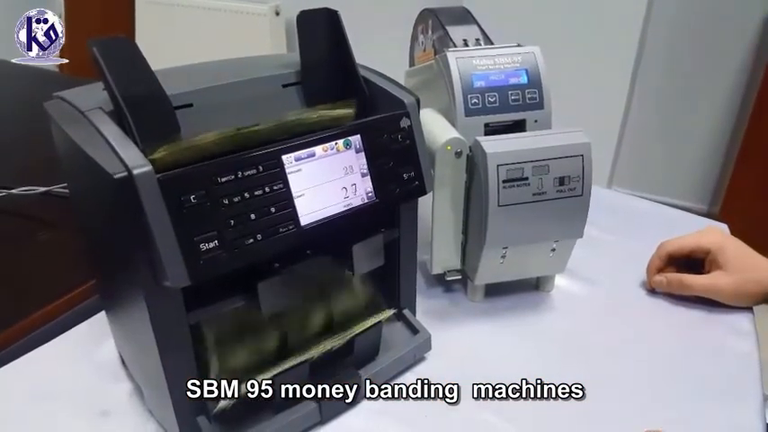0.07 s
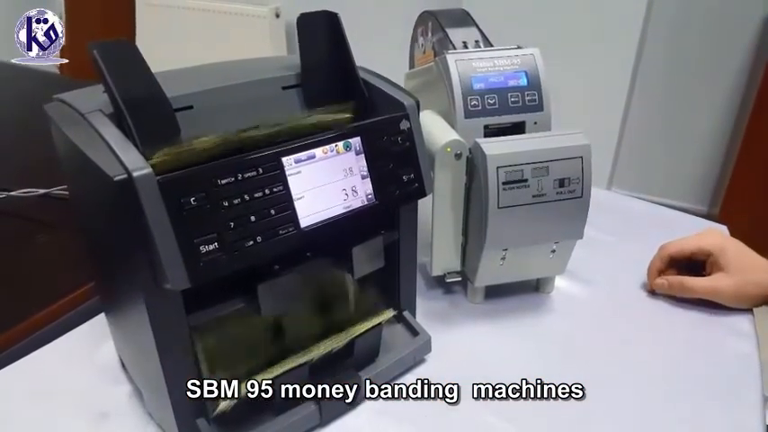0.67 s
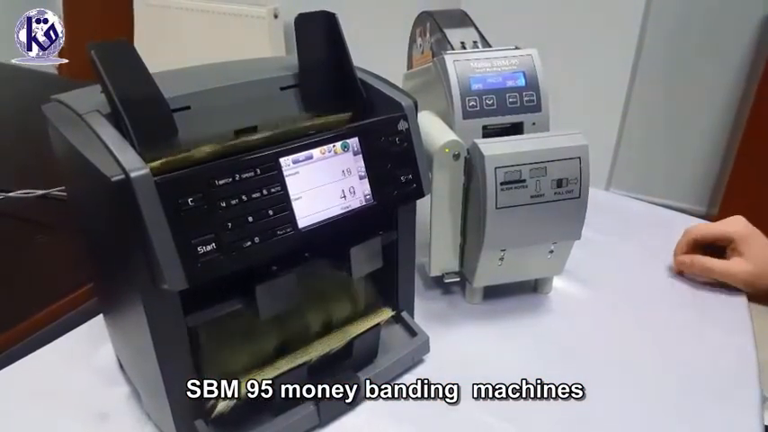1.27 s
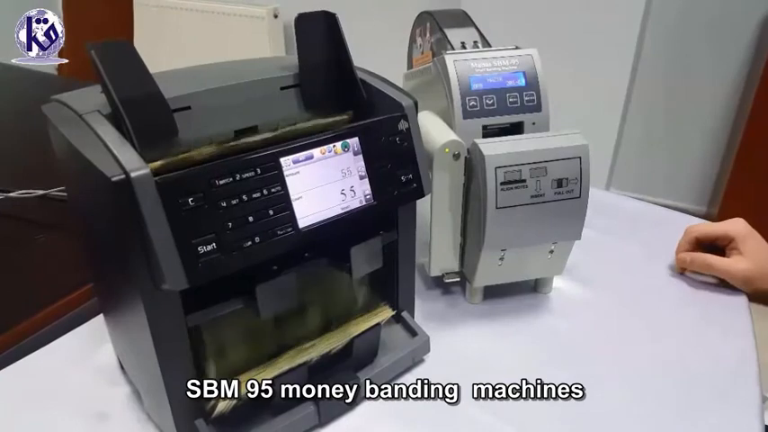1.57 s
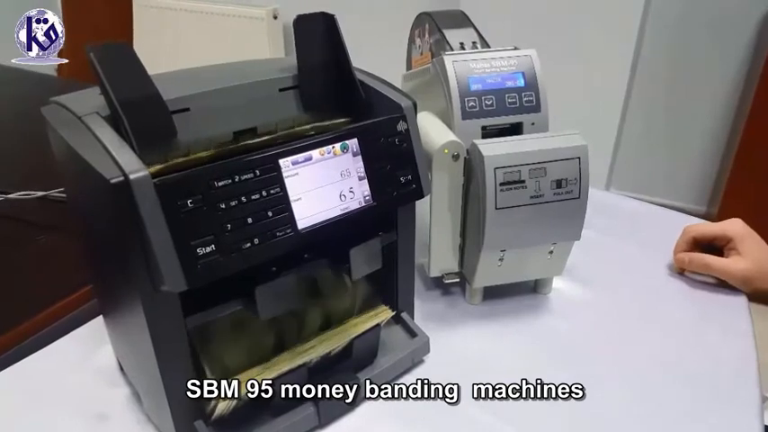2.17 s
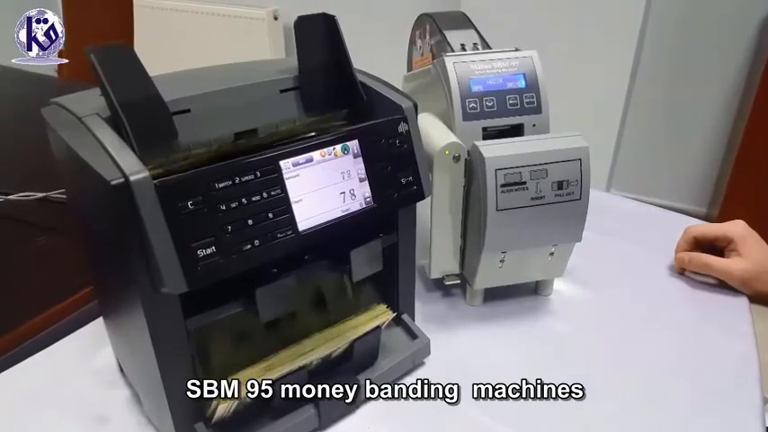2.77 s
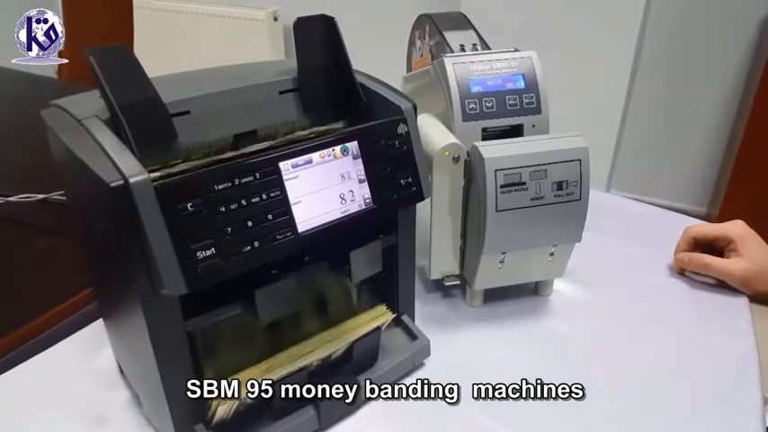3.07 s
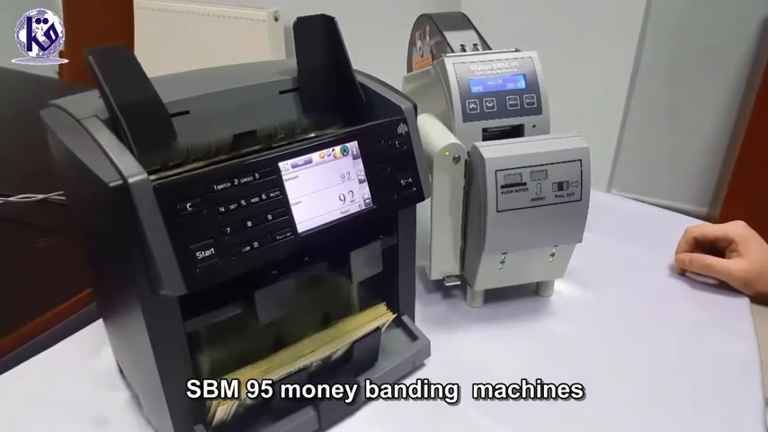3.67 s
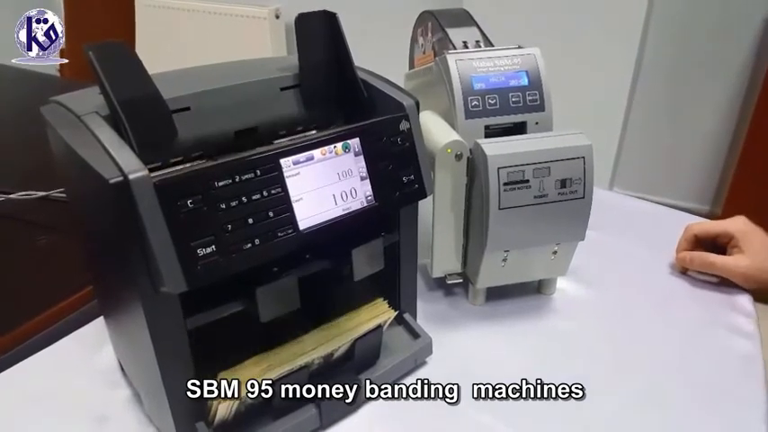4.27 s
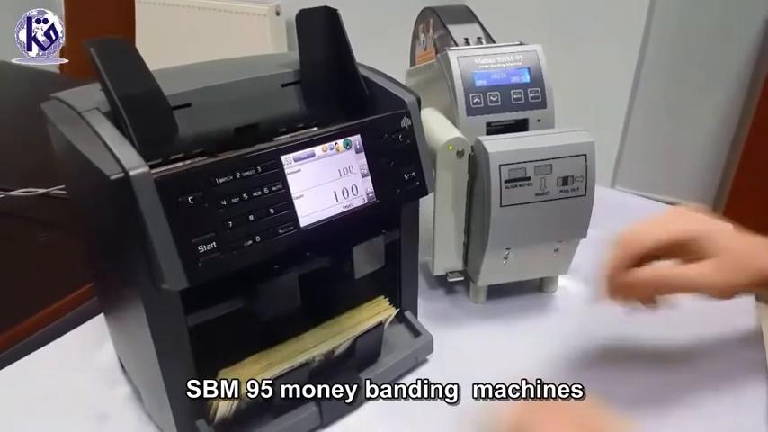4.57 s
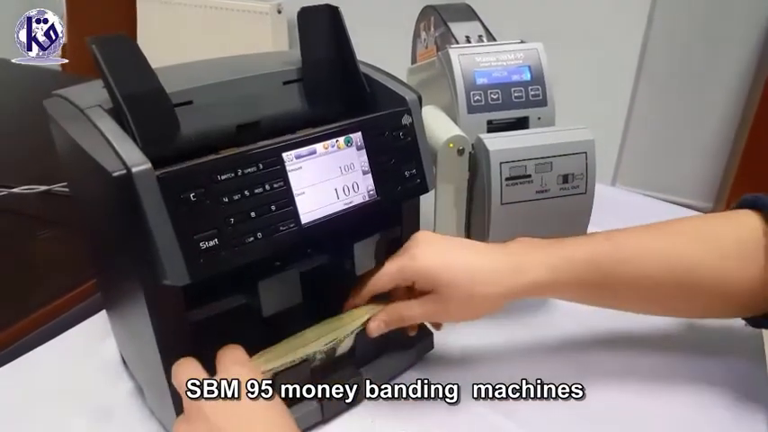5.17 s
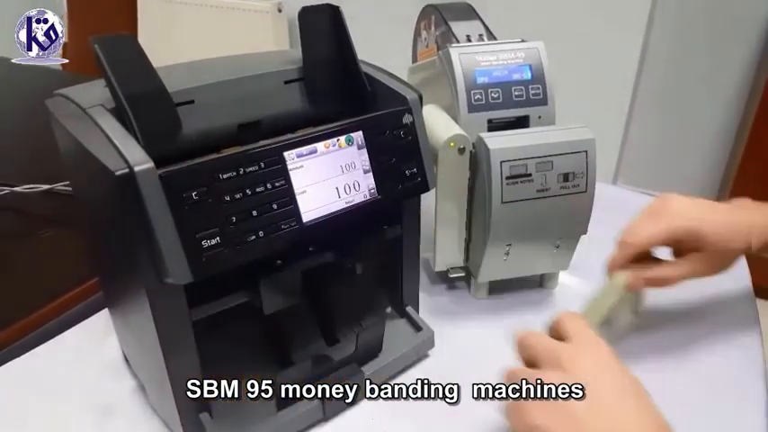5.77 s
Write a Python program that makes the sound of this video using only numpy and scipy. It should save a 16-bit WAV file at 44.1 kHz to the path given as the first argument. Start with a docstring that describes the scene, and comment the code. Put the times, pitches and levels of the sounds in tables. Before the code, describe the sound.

A banknote counter runs with rapid paper snaps over a rattling motor, then winds down, and hands lift out the rustling stack.

```python
"""In a small, humming office, a banknote counter on a desk pulls through about eighteen notes a second.
Each one snaps out of the rollers, slaps into the stacker and thumps the plastic housing, over a bed of
belt rattle and motor growl. At four seconds the hopper runs empty: the feeder clacks, the drive whirs
on unloaded, then brakes. Hands lift out the stack, which rustles, bumps and squeaks over the tray."""
import sys
import numpy as np
from scipy import signal
from scipy.fft import rfft, irfft, next_fast_len
from scipy.io import wavfile
from scipy.ndimage import uniform_filter1d

SR = 44100
rng = np.random.default_rng(int(sys.argv[2]) if len(sys.argv) > 2 else 0)


def bounce(signal):
    """Save signal as a 16-bit WAV file at the path given by the first command-line argument."""
    frames = np.transpose(np.atleast_2d(signal))
    limited = np.clip(frames, -1, 1)
    pcm = np.round(limited * 32767).astype(np.int16)
    wavfile.write(sys.argv[1], SR, pcm)


N = 256220
TIME = np.arange(N) / SR
PADDED = next_fast_len(N + SR // 2, real=True) // 2 * 2
BINS = np.maximum(np.fft.rfftfreq(PADDED, 1 / SR), 1)

EMPTY_S, UNLOAD_S, BRAKE_S = 4.0, 0.11, 4.57   # hopper empty, time to shed the load, brake on
# drive faders: loaded level/dB, unloaded level/dB, coasting sag/(dB/s), braking fall/(dB/s)
RUMBLE_RUN, RATTLE_RUN = (-30.5, -41, -6, 122), (-34, -40.5, 7.5, 202)
PAPER_RUN, WHEEL_RUN = (-38.5, -58.5, 12, 108), (-53, -45.5, 4.5, 33)
GROWL_RUN, TONES_RUN, GEAR_RUN = (-42, -40.5, 7, 97), (-39, -37.5, 9, 170), (-46.5, -38, 18, 165)

# ventilation air: f/Hz, level/dB
OFFICE_AIR = [(25, -25), (42, -18.5), (56, -6.5), (75, -6.5), (90, -17), (115, -4), (150, -11),
              (175, -16.5), (220, -15), (330, -21), (550, -32.5), (1400, -49), (5000, -53.5), (16000, -57)]
# ventilation hum: f/Hz, level/dB
OFFICE_HUM = [(70.5, -54), (102.3, -63.5), (122.8, -51), (140.5, -49), (194, -61)]
# roller rumble: f/Hz, level/dB
ROLLER_RUMBLE = [(40, -49), (95, -26), (150, -8), (220, -7.5), (340, -0.5), (440, 0), (580, -3.5),
                 (750, -7), (1000, -12.5), (1600, -29.5), (5000, -51.5)]
# belt rattle: f/Hz, level/dB
BELT_RATTLE = [(400, -25), (850, -3), (1050, -6.5), (1300, -1.5), (1600, -2), (2100, -9.5), (2800, -12.5),
               (3600, -15.5), (7000, -34), (16000, -52)]
# bright swish of notes on the pile: f/Hz, level/dB
PILE_SWISH = [(3000, -23), (6000, -14), (8400, 4.5), (10000, -5), (12500, 3), (16000, -1.5)]
# hiss of running paper: f/Hz, level/dB
PAPER_HISS = [(1000, -11), (2500, 1), (3500, 1.5), (4900, -4), (6500, -4), (8500, -6), (10000, -12),
              (12500, -8.5), (16000, -15)]
# gear mesh pitch, following motor speed: t/s, f/Hz
GEAR_PITCH = [(0, 1415), (4.02, 1402), (4.15, 1475), (4.3, 1464), (4.52, 1533), (4.62, 1350), (4.8, 1000)]
# upper body resonances that the drive keeps ringing: f/Hz, level/dB
BODY_TONES = [(385, -8.5), (482, -9), (558, -5), (596, -4), (679, -11), (835, -11.5), (961, -13)]
# hiss of the stacker wheels: f/Hz, level/dB
WHEEL_HISS = [(500, -1.5), (800, 6.5), (1100, 1), (1950, -4), (2400, -9.5), (3700, -6), (4700, -15.5),
              (7100, -16), (9300, -22), (16000, -19)]
# resonances of the wheels and their blades: f/Hz, width/Hz, gain/dB
WHEEL_RINGS = [(930, 40, 2.5), (1990, 100, 7), (2800, 110, 1), (3310, 150, 3), (6700, 500, 5),
               (7500, 600, 3), (10140, 260, 6), (11700, 570, 5.5), (13200, 250, 2.5)]
# pings of a buckling note: f/Hz, level/dB
NOTE_PINGS = [(2650, -14), (4320, 10), (4880, 3), (5300, 1), (5850, 8), (6350, 2), (8200, -7)]
# cue for each note, with accents against an ordinary one: t/s, snap/dB, knock/dB, thump/dB
NOTE_CUES = [(0.0049, 1, 4.5, 2.5), (0.0589, 2, -1, 2), (0.1133, 1, 11, 1), (0.1681, 1.5, 4, 2.5),
             (0.2229, 1, 0, 0), (0.2768, 3, -4, 4), (0.3314, 1, -8, -1), (0.386, 0, -17, -1),
             (0.4409, 2, -7, 3), (0.4952, 3, 2, 6), (0.549, 2, -10, 1), (0.6014, 0, 4, 3),
             (0.6556, 0.5, -7, -1), (0.7111, -3, -5, 4.5), (0.766, -1, 0, 3.5), (0.8196, -1.5, 2, 3),
             (0.8757, -15, -11, 5), (0.9285, -3, -18, 0), (0.9842, -2.5, 3, 3), (1.0386, 2, 8, 4.5),
             (1.0935, -3, 3, 3), (1.1463, 1.5, -0.5, 4), (1.202, -3, -13, 5.5), (1.255, 1.5, 3, -1.5),
             (1.3112, 2, -5, -5), (1.3645, 0, 4, -1.5), (1.4188, 0.5, 4.5, -10), (1.4492, 0, -7, 3),
             (1.505, 1, 4, -1), (1.5578, 0, 5, 1), (1.6114, 2.5, 4, 2), (1.6652, 1.5, 4, 2),
             (1.7209, 0, -2, -1), (1.7737, 3, 5.5, 5), (1.8286, -3.5, 4.5, 5), (1.8822, -2.5, -6, -3),
             (1.9381, 2.5, -15, -9), (1.9912, 0.5, -2, 0), (2.0444, 1.5, -1, 2), (2.1, 3, 5, 1.5),
             (2.1553, 1, 5, 0.5), (2.2083, -4.5, -3, 0.5), (2.262, 3.5, 4, 3), (2.3145, -2, -15, 0),
             (2.3732, 4, -11, 0.5), (2.424, 3, 0, 1), (2.48, 0, -16, 4), (2.532, -2.5, -8, -3),
             (2.588, -5, -4, 2.5), (2.6401, 0.5, 5, 2), (2.6956, 1.5, -7, 3), (2.7489, 2.5, -11, -7),
             (2.8033, 1.5, -6, -7), (2.8569, 3, 4, 0), (2.9118, 2, 4, 0.5), (2.9654, 4.5, 1, -2),
             (3.0207, 6.5, -2, -4.5), (3.0735, 3, 3, -1.5), (3.129, 2.5, 6.5, -3), (3.1826, -1, 3, -0.5),
             (3.2375, 1, -2, -10.5), (3.2907, 3.5, -14, -7), (3.3445, 0, -14, 4), (3.3984, 2, -8, -3.5),
             (3.454, -3, 8, -4.5), (3.508, 0, -8, 0.5), (3.5641, -1, -15, 0.5), (3.616, -10, 2, -1.5),
             (3.6695, -3.5, -19, 1), (3.7257, 1, 4, 1), (3.7787, 2.5, 5.5, -3), (3.833, 5, 4.5, 0),
             (3.8864, 4, 3, -12), (3.9405, 2, 6, -1.5), (3.9944, -4, 4.5, -0.5)]
# crack of crisp paper: f/Hz, level/dB
PAPER_CRACK = [(800, -23.5), (2000, -3), (2800, 2.5), (3500, -2.5), (4300, -2.5), (5000, -3), (6000, -4),
               (7000, -9), (8300, -10), (10000, -15.5), (13000, -16), (16000, -24)]
# guide plate modes: f/Hz, level/dB, t60/s
PLATE_MODES = [(670, 1, 0.012), (1354, -1, 0.017), (1536, 3, 0.0094), (1880, 4, 0.0028), (2820, 0.5, 0.003)]
# plastic housing modes: f/Hz, level/dB, t60/s
HOUSING_MODES = [(287, -9, 0.018), (344.4, 1.5, 0.078), (486, -16, 0.054), (572, -13, 0.062)]
# roller frame modes: f/Hz, level/dB, t60/s
FRAME_MODES = [(490, -4, 0.027), (587, 2, 0.021), (797, 0, 0.0089), (935, -4, 0.014), (1350, -1, 0.006)]
# resonances of the open stacker cavity: f/Hz, width/Hz, gain/dB
STACKER_CAVITY = [(180, 44, -0.5), (438.5, 32, -11), (482, 45, 0), (587, 72, 1.5), (651, 56, -3.5),
                  (1215, 50, 2.5), (1820, 40, 0), (2075, 1320, 4), (2640, 560, 1), (3480, 170, -2.5),
                  (4340, 98, 1.5), (5090, 830, 4), (8400, 330, 0.5)]
# hard paper slaps in the stacker, then faint ticks and crackles: t/s, level/dB, decay/s
SLAP_AND_CRACKLE_CUES = [(1.2112, -19, 0.0022), (1.948, -26, .002), (2.0868, -14.5, 0.0088),
                         (2.922, -20, .002), (3.138, -17, 0.0026), (3.734, -18, .002), (3.791, -21, .002),
                         (3.843, -20, .002), (3.949, -12, 0.0023), (4.094, -36.5, 0.0035),
                         (4.806, -48, .002), (4.907, -47.5, 0.0049), (5.076, -54, 0.0018),
                         (4.953, -52, .003), (5.114, -51, 0.0022), (5.358, -39, .006), (5.394, -42, .003),
                         (5.41, -47.5, .003), (5.452, -49, 0.0033), (5.788, -55, 0.0022)]
# clacks of the empty feeder: t/s, level/dB
CLACK_CUES = [(4.093, -27), (4.157, -29), (4.195, -25)]
# colour of a clack: f/Hz, level/dB
CLACK_COLOUR = [(600, -24), (1500, 5.5), (1900, 11), (2400, 9), (3100, -7), (4000, -19), (16000, -37)]
# fingers and stack bumping the tray: t/s, level/dB
BUMP_CUES = [(4.908, -55.5), (4.954, -51.5), (5.1126, -51.5), (5.1465, -56), (5.333, -63), (5.358, -56),
             (5.394, -52), (5.416, -50)]
# tray modes: f/Hz, level/dB, t60/s
TRAY_MODES = [(365, -3, 0.28), (880, 0.5, 0.13), (1240, 0, 0.056), (1537, -3, 0.052), (2220, -6, 0.043)]
# notes sliding together in the grip: peak t/s, level/dB, rise/s, decay/s
SLIDE_CUES = [(4.937, -60, 0.0059, .005), (5.235, -47.5, .014, 0.012)]
# hands gripping, loosening and drawing out the stack: peak t/s, level/dB, rise/s, decay/s
STROKE_CUES = [(4.945, -57, 0.037, 0.02), (5.23, -60, 0.045, 0.03), (5.368, -43, 0.023, 0.02),
               (5.422, -49, 0.031, 0.026)]
# rustle of the stack: f/Hz, level/dB
STACK_RUSTLE = [(200, -25), (370, -6), (560, -13.5), (900, -8.5), (1520, -7), (2700, -7), (3300, -7.5),
                (4300, -16), (5400, -15), (7000, -18.5), (10000, -28), (16000, -27)]
# resonances of the hollow tray: f/Hz, width/Hz, gain/dB
TRAY_HOLLOW = [(383, 50, 3), (950, 56, 11), (1530, 160, 10), (1900, 70, 5), (2295, 46, 10.5)]
# stack edge squeaking on the tray: peak t/s, level/dB, rise/s, decay/s
SQUEAK_CUES = [(5.195, -56, 0.013, .04), (5.26, -64, .015, .03), (5.355, -47, 0.018, 0.028),
               (5.415, -46.5, 0.024, 0.018)]
# falling pitch of the squeak: t/s, f/Hz
SQUEAK_PITCH = [(5.19, 2020), (5.28, 1880), (5.33, 1540), (5.45, 1485)]
# stereo width of the noise layers: f/Hz, left-right correlation
STEREO_LIKENESS = [(60, 0.24), (140, 0.98), (350, 0.99), (700, 0.78), (1400, 0.83), (2800, 0.35),
                   (5000, 0.12), (12000, 0.08)]
# stereo lean: f/Hz, left over right/dB
STEREO_BALANCE = [(60, 9), (200, -1), (500, 3), (1000, 1), (2000, 4), (4500, -1.5), (8000, 5.5), (13000, 2)]


def from_db(db):
    """Decibels to gain."""
    return 10 ** (np.asarray(db) / 20)


def unit_power(x):
    """Scale to an RMS of 1."""
    return x / np.sqrt(np.mean(np.abs(x) ** 2) + 1e-20)


def in_time(points):
    """A breakpoint curve, read at every sample."""
    return np.interp(TIME, *np.transpose(points))


def in_hz(points):
    """A curve over log frequency, read at every bin."""
    hz, value = np.transpose(points)
    return np.interp(np.log(BINS), np.log(hz), value)


def drift(rate_hz):
    """A random modulator with an RMS of 1."""
    knots = rng.standard_normal(int(N / SR * rate_hz) + 2)
    return unit_power(np.interp(TIME * rate_hz, np.arange(len(knots)), knots))


def scatter(values, spread):
    """Nudge each hit's time or level at random."""
    return values + spread * rng.standard_normal(len(values))


def clicks(times, heights):
    """Single-sample hits."""
    return np.bincount(np.clip(np.round(times * SR).astype(int), 0, N - 1), heights, N)


def dying(hits, decay_s):
    """Give each hit an exponential tail."""
    return signal.lfilter([1], [1, -np.exp(-1 / (decay_s * SR))], hits + 1e-18)


def swells(cues):
    """An envelope that rises to each cue's peak and dies away."""
    return sum(from_db(db) * np.exp(-np.maximum((s - TIME) / rise, (TIME - s) / decay))
               for s, db, rise, decay in cues)


def ring(hits, hz, t60):
    """Each hit rings a decaying sine of its own height."""
    radius, angle = from_db(-60 / (t60 * SR)), 2 * np.pi * hz / SR
    return signal.lfilter([0, np.sin(angle)], [1, -2 * radius * np.cos(angle), radius ** 2], hits + 1e-18)


def strike(times, level_db, modes, uneven_db, polarity=-1):
    """Ring a body's modes in a new blend on every hit; polarity -1 flips every other mode."""
    return sum(polarity ** k * ring(clicks(times, from_db(scatter(level_db + db, uneven_db))), hz, t60)
               for k, (hz, db, t60) in enumerate(modes))


def band(x, low_hz, high_hz):
    """A gentle band-pass."""
    return signal.sosfilt(signal.butter(2, [low_hz, high_hz], "band", fs=SR, output="sos"), x)


def resonate(x, resonances):
    """A chain of bell boosts and cuts."""
    response = 1
    for hz, width, db in resonances:
        detuning = hz / width * (BINS / hz - hz / BINS)
        response = response * (1 + (from_db(db) - 1) / (1 + 1j * detuning))
    return irfft(rfft(x, PADDED) * response)[:, :N]


def minimum_phase(colour):
    """An EQ curve at unit power, with no pre-ring to blur the attacks."""
    cepstrum = irfft(np.log(unit_power(from_db(in_hz(colour)))))
    cepstrum[1:PADDED // 2] *= 2
    cepstrum[PADDED // 2 + 1:] = 0
    return np.exp(rfft(cepstrum))


def noise(envelope, colour):
    """Enveloped, coloured stereo noise, narrow in the low mids and wide in the treble."""
    mid, side = rfft(envelope * rng.standard_normal((2, N)), PADDED)
    alike = in_hz(STEREO_LIKENESS)
    pair = np.sqrt((1 + alike) / 2) * mid + np.sqrt((1 - alike) / 2) * side * [[1], [-1]]
    return irfft(pair * minimum_phase(colour))[:, :N]


def over_count(times, first_db, last_db):
    """A level ride in dB from full hopper to empty."""
    return np.interp(times, [0, EMPTY_S], [first_db, last_db])


def drive_db(fader):
    """A drive part's level: steady under load, sloping as it coasts, falling under the brake."""
    loaded_db, free_db, sag, fall = fader
    level = np.interp(TIME, [EMPTY_S, EMPTY_S + UNLOAD_S], [loaded_db, free_db])
    coasted_s = np.clip(TIME - EMPTY_S - UNLOAD_S, 0, BRAKE_S - EMPTY_S)
    return level - sag * coasted_s - fall * np.maximum(TIME - BRAKE_S, 0)


def tone(hz, rough, width_hz):
    """A rubbing or turning part: a sine with the rough share of its power smeared into a band."""
    phase = 2 * np.pi * np.cumsum(np.broadcast_to(hz, N)) / SR + rng.uniform(0, 2 * np.pi)
    smear = drift(width_hz) * np.sin(phase) + drift(width_hz) * np.cos(phase)
    return np.sqrt(2 * (1 - rough)) * np.sin(phase) + np.sqrt(rough) * smear


def office(air_db=-49.0, wander_turns=0.21):
    """Room tone: ventilation rumbles and hums with close, gently wandering tones that beat."""
    hum = sum(from_db(db) * np.sqrt(2) * np.sin(2 * np.pi * (hz * TIME + wander_turns * drift(2.003)))
              for hz, db in OFFICE_HUM)
    return noise(from_db(air_db), OFFICE_AIR) + hum


def transport(times):
    """Rollers rumble and belts rattle harder as each note loads the drive, while the paper hiss ducks."""
    load = uniform_filter1d(dying(clicks(times, np.ones(len(times))), decay_s=0.012), SR // 110)
    load -= uniform_filter1d(load, SR // 9)   # pump around the average level
    rub_db = over_count(TIME, 0, 1) + 1.67 * drift(14)   # the growing stack rubs more
    rumble = noise(from_db(drive_db(RUMBLE_RUN) + 3.5 * load), ROLLER_RUMBLE)
    rattle = noise(from_db(drive_db(RATTLE_RUN) + 7 * load + 2.5 * drift(400)), BELT_RATTLE)
    paper_db = drive_db(PAPER_RUN)
    swish = noise(from_db(paper_db + over_count(TIME, -25.5, -11.5) + 2.5 * drift(27)), PILE_SWISH)
    hiss = noise(from_db(paper_db + rub_db - 3.5 * load + 2 * drift(900)), PAPER_HISS)
    return rumble + rattle + swish + hiss


def motor(times, growl_hz=348.7, choke_s=0.01):
    """The body growls, choked by each note; the gears rise once unloaded and sink under the brake."""
    choke = uniform_filter1d(dying(clicks(times - choke_s, np.ones(len(times))), choke_s), SR // 150)
    growl = from_db(drive_db(GROWL_RUN) - 12 * choke) * tone(growl_hz, rough=.55, width_hz=45)
    body = sum(from_db(db) * tone(hz, rough=.8, width_hz=35) for hz, db in BODY_TONES)
    gear_hz = in_time(GEAR_PITCH)
    mesh = tone(gear_hz, rough=.75, width_hz=80)
    whirr = tone(gear_hz, rough=1, width_hz=380)
    overtone = from_db(-14) * tone(2 * gear_hz, rough=1, width_hz=160)
    gears = from_db(drive_db(GEAR_RUN)) * (mesh + whirr + overtone)
    return growl + from_db(drive_db(TONES_RUN)) * body + gears


def stacker_wheels(flutter_db=1.5):
    """The bladed wheels hiss and flutter, come forward once the notes are gone, then fade."""
    envelope = from_db(drive_db(WHEEL_RUN) + flutter_db * drift(200))
    return resonate(noise(envelope, WHEEL_HISS), WHEEL_RINGS)


def creases(per_s=110.0, trim_db=-2.5, spread_db=8.5, t60=0.0097):
    """Small creases tick past the guides at random, each pinging at one pitch."""
    ticks = rng.random(N) < per_s / SR
    accent_db = spread_db * np.clip(rng.standard_normal(N), -2, 2)
    hits = ticks * from_db(drive_db(PAPER_RUN) + trim_db + accent_db)
    choice = rng.integers(0, len(NOTE_PINGS), N)
    return sum(ring(hits * (choice == k) * from_db(db), hz, t60) for k, (hz, db) in enumerate(NOTE_PINGS))


def snaps(times, crack_db, slap_delay_s=.009, buckle_s=0.0012):
    """A note strains and snaps free of the rollers, then slaps the stacker."""
    strain = dying(clicks(times, from_db(crack_db - 11))[::-1], decay_s=0.012)[::-1]   # reverse swell
    snap = dying(clicks(times, from_db(crack_db + 5.5)), decay_s=0.0034)
    slap_times = scatter(times + slap_delay_s, 0.00057)
    slap = dying(clicks(slap_times, from_db(over_count(times, -34.5, -30))), decay_s=0.0093)
    # paper takes a moment to buckle, which rounds each attack
    return noise(uniform_filter1d(strain + snap + slap, int(buckle_s * SR)), PAPER_CRACK)


def knocks(times, accent_db, lead_s=0.000797):
    """Each leading edge strikes the guide plate: a light, bright knock with no bass."""
    plate = strike(times - lead_s, accent_db - 22.5, PLATE_MODES, uneven_db=1.6)
    return band(plate, low_hz=410, high_hz=5020)


def pings(times, crack_db, trim_db=-5.5, t60=0.016, detune=.02):
    """Every note is creased differently, so it pings at a pitch of its own."""
    hz, db = np.array(NOTE_PINGS)[rng.integers(0, len(NOTE_PINGS), len(times))].T
    hz = hz * np.exp(detune * rng.uniform(-0.82, 1, len(times)))
    gains = from_db(crack_db + trim_db + db)
    return sum(ring(clicks(np.array([s]), [gain]), pitch, t60) for s, gain, pitch in zip(times, gains, hz))


def releases(times, crack_db, boost_db=18.5, delay_s=.0003):
    """The sprung edge of each note lets go with one hard spike."""
    spikes = clicks(times + delay_s, from_db(crack_db + boost_db))
    return irfft(rfft(spikes, PADDED) * minimum_phase(PAPER_CRACK))[:N]


def kicks(times, accent_db, delay_s=0.0021, length_s=0.015, start_hz=265, end_hz=335):
    """The rubber feed roller shoves the next note: a soft thump, bending up as the grip tightens."""
    t = TIME[:int(length_s * SR)]
    progress = t / length_s
    turns = t * (start_hz + (end_hz - start_hz) * progress / 2)
    thump = np.sin(np.pi * progress) * np.sin(2 * np.pi * turns)
    level_db = np.interp(times, [0.56, 0.71], [-23, -27.5]) + accent_db   # harder under a heavy hopper
    hits = clicks(scatter(times + delay_s, 0.00044), from_db(level_db))
    return signal.fftconvolve(hits, thump)[:N]


def brushes(times, land_s=.0105, settle_s=0.045, soften_s=.003):
    """Each note brushes the pile with two bright swishes: as it lands and as it settles."""
    level_db = over_count(times, -40.5, -33)
    land = clicks(times + land_s, from_db(scatter(level_db, 0.5)))
    settle = clicks(times + settle_s, from_db(scatter(level_db + 3, 0.5)))
    return noise(uniform_filter1d(dying(land + settle, decay_s=0.0022), int(soften_s * SR)), PILE_SWISH)


def rebounds(times, accent_db, delay_s=0.01526):
    """The pile drops back and rings the plastic housing."""
    drop_times = scatter(times + delay_s, 0.00056)
    level_db = over_count(times, -28, -25.5) + accent_db
    housing = strike(drop_times, level_db, HOUSING_MODES, uneven_db=1.0, polarity=1)
    return band(housing, low_hz=222, high_hz=850)


def flicks(times, delay_s=.0178):
    """Each trailing edge flicks off the roller and knocks its frame."""
    return strike(times + delay_s, over_count(times, -25.5, -24.5), FRAME_MODES, uneven_db=3.0)


def slaps_and_crackles():
    """Some notes slap the stacker hard; later the paper ticks and crackles faintly in the hands."""
    bursts = sum(dying(clicks(np.array([s]), from_db([db])), decay)
                 for s, db, decay in SLAP_AND_CRACKLE_CUES)
    return noise(bursts, PAPER_CRACK)


def feeder_clacks():
    """With no notes left to grab, the feeder clacks."""
    times, level_db = np.transpose(CLACK_CUES)
    return noise(dying(clicks(times, from_db(level_db)), decay_s=0.0047), CLACK_COLOUR)


def tray_bumps():
    """The plastic tray rings as the stack is gripped and pulled over its lip."""
    times, level_db = np.transpose(BUMP_CUES)
    return strike(times, level_db, TRAY_MODES, uneven_db=2.0)


def stack_lift(held_db=-77, grain_db=2.5):
    """Notes slide in the grip, rustle in the hollow tray and squeak over its lip with a falling pitch."""
    slides = noise(swells(SLIDE_CUES), PAPER_CRACK)
    grip_s = STROKE_CUES[0][0]
    handling = swells(STROKE_CUES) + from_db(held_db) * (TIME > grip_s)
    rustle = noise(handling * from_db(grain_db * drift(350)), STACK_RUSTLE)
    squeak = swells(SQUEAK_CUES) * tone(in_time(SQUEAK_PITCH), rough=1, width_hz=130)
    return slides + resonate(rustle, TRAY_HOLLOW) + squeak


def placed(x, right_lag_s=0.00014):
    """Set the stereo image: the left side leads, and each side has its own colour."""
    left, right = rfft(x, PADDED)
    lean = from_db(in_hz(STEREO_BALANCE) / 2)
    lag = np.exp(-2j * np.pi * BINS * right_lag_s)
    return irfft([left * lean, right / lean * lag])[:, :N]


def room(x, wet_db=-11.0, t60=0.18, damping_hz=6000):
    """Desk and walls return a short diffuse tail, different on each side."""
    t = TIME[:SR // 2]
    tail = rng.standard_normal((2, len(t))) * from_db(-60 * t / t60) * (t > .003)
    tail /= np.sqrt(np.sum(tail ** 2) / 2)
    response = rfft(tail, PADDED) / (1 + 1j * BINS / damping_hz)
    return x + from_db(wet_db) * irfft(rfft(x, PADDED) * response)[:, :N]


def scene():
    """Mix the counter and the hands into the room, over the office tone."""
    times, snap_db, knock_db, thump_db = np.transpose(NOTE_CUES)
    crack_db = over_count(times, -27, -29.5) + snap_db
    cracks = snaps(times, crack_db) + pings(times, crack_db) + releases(times, crack_db)
    impacts = knocks(times, knock_db) + kicks(times, thump_db) + rebounds(times, thump_db) + flicks(times)
    paper_path = transport(times) + creases() + cracks + impacts + brushes(times)
    counter = resonate(paper_path, STACKER_CAVITY) + motor(times) + stacker_wheels() + feeder_clacks()
    return room(placed(counter + slaps_and_crackles() + tray_bumps() + stack_lift())) + office()


def record(dry, cutoff_hz=16000):
    """A steep high cut on the master."""
    return signal.sosfilt(signal.ellip(12, .1, 90, cutoff_hz, fs=SR, output="sos"), dry)


dry = scene()
out = record(dry)
bounce(out)
```